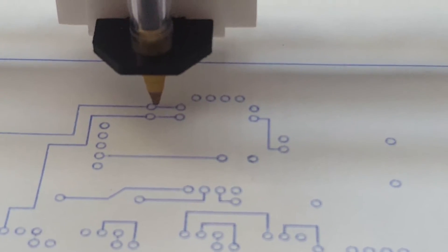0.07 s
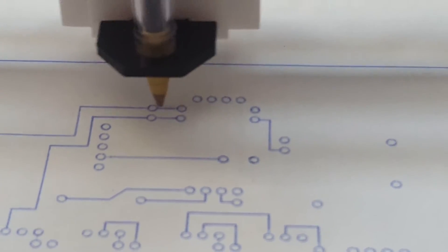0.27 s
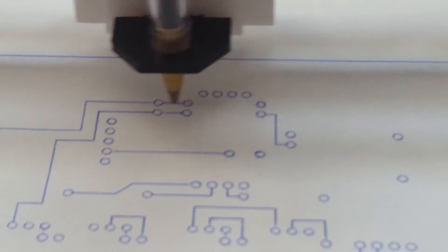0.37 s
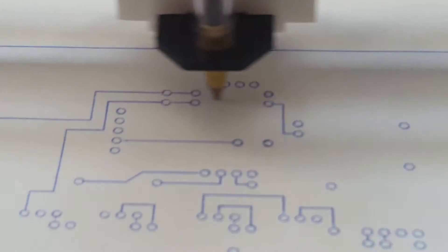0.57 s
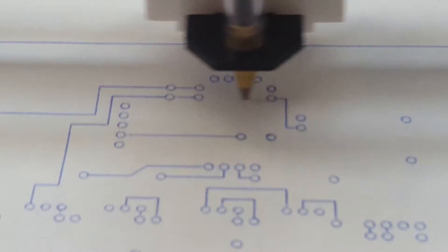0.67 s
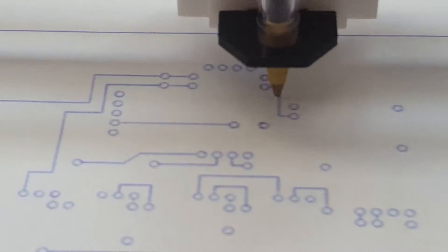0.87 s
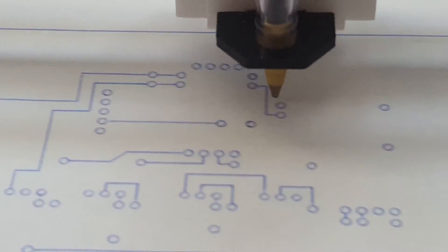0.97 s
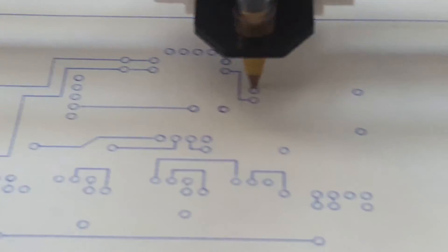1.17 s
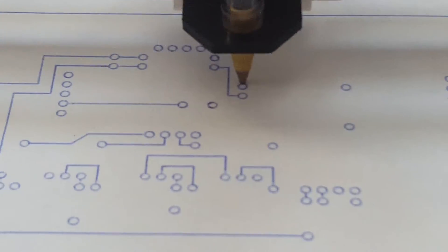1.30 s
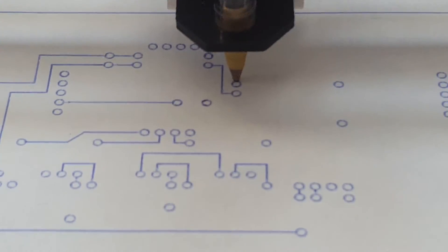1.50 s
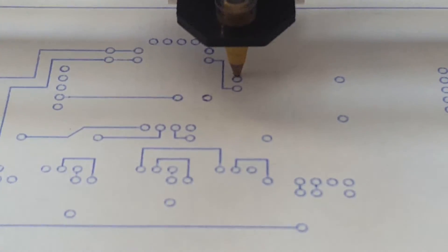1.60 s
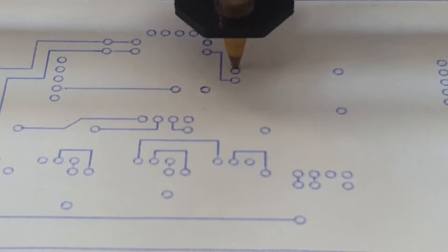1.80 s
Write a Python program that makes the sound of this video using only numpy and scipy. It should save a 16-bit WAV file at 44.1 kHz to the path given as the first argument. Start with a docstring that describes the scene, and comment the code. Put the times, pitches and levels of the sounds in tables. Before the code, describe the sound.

A pen plotter is heard close in a quiet room, starting with faint rapid ticks. At 0.2 seconds its stepper motors start with a click and whir upward in pitch, peaking near 0.7 seconds, then fall, with rattly pulses and small clacks. They stop with a light knock just before 1.2 seconds. A short servo buzz and soft thud follow, then faint rapid ticking until about 1.9 seconds.

```python
"""A pen plotter's stepper motors sing through one move, heard close by in a quiet room.
They speed up and slow down evenly, so their tones rise and fall, swelling at the frame's resonances.
Loose parts rattle at certain speeds, the carriage rustles, and starting and stopping knock the frame.
Then a small geared servo motor lowers the pen. It ticks as it holds still, before and after the move."""
import sys
import numpy as np
from scipy import signal
from scipy.fft import rfft, irfft, next_fast_len
from scipy.io import wavfile
from scipy.ndimage import map_coordinates

SR = 44100
rng = np.random.default_rng(int(sys.argv[2]) if len(sys.argv) > 2 else 0)


def log_audio(samples):
    """Write samples as a 16-bit WAV file to the path given in sys.argv[1]."""
    # one column per channel
    frames = np.atleast_2d(samples).T
    # limit to full scale, then quantise
    limited = np.clip(frames, -1, 1)
    pcm = np.round(limited * 32767).astype(np.int16)
    wavfile.write(sys.argv[1], SR, pcm)


N = 81585

# The stepper motors' tones. Each entry: pitch as a multiple of the step rate.
STEP_MULTIPLES = [1, 2, 4.92, 9.84, 16, 24.6, 32]
# How strong the tones are, one list per tone. Each pair: step rate in Hz, level in dB.
STEP_LEVELS = [
    [(100, -71), (125, -41.5), (140, -31.5), (158, -28.5), (174, -38.5), (192, -26.5), (205, -25.5),
     (222, -18.5), (235, -20.5)],
    [(60, -57), (85, -42), (100, -49), (112, -29), (128, -33), (145, -48.5), (180, -42), (215, -39.5),
     (235, -43)],
    [(20, -59), (35, -40.5), (48, -32.5), (62, -47), (85, -43), (103, -38.5), (135, -49.5), (175, -44.5),
     (200, -36.5), (225, -42.5), (235, -67)],
    [(15, -66), (24, -31.5), (35, -62), (80, -50.5), (92, -50), (100, -35.5), (112, -49), (125, -43),
     (150, -54), (190, -50.5), (205, -70)],
    [(8, -67), (12, -41), (15, -22), (21, -37), (27, -26.5), (37, -28.5), (47, -54), (55, -46.5),
     (67, -44.5), (78, -52), (92, -45), (120, -53), (160, -52), (182, -47.5), (195, -51.5), (208, -39.5),
     (220, -48), (235, -44)],
    [(110, -60), (150, -67.5), (200, -55), (235, -59)],
    [(70, -60), (105, -50.5), (130, -59), (170, -50), (195, -60)],
]
# Where the tones sit. Each entry: left level minus right level in dB.
STEP_PANS = [0, 4, 0, 0.5, 2.5, -2, -1.5]
# Loose parts chattering. Each row: step rate in Hz, level in dB.
RATTLE_LEVELS = [(3, -62), (18, -55.5), (33, -46.5), (40, -46.5), (47, -38.5), (57, -49.5), (66, -57),
                 (77, -39), (88, -57), (100, -33), (110, -58), (119, -46.5), (135, -54.5), (175, -67),
                 (193, -47.5), (210, -59.5)]
# The tone colour of the loose parts. Each row: frequency in Hz, relative level in dB.
RATTLE_COLOUR = [(410, -24), (700, -10), (988, 3), (1500, 0), (1710, -7.5), (2880, -3.5), (3130, -9.5),
                 (4210, -13), (4470, -21.5), (5350, -18.5), (6390, -29), (7370, -22.5), (12000, -46),
                 (15600, -69), (22000, -120)]
# Single clacks of the loose parts. Each row: start in seconds, level in dB.
CLACKS = [(.279, -37), (.2905, -32), (.3105, -35.5), (.3155, -41), (.3195, -39), (.3315, -30.5),
          (.376, -39), (.423, -32), (.456, -31), (.961, -34), (1.005, -41), (1.060, -26.5), (1.067, -30),
          (1.111, -38.5), (1.138, -39.5), (1.179, -37)]
# Knocks on the frame. Each row: start in seconds, level in dB.
JOLTS = [(.219, -26), (0.257, -30), (1.140, -28), (1.18, -39)]
# The frame's ringing notes. Each row: pitch in Hz, relative level in dB, seconds to fade by 60 dB.
FRAME_NOTES = [(160, -41, 0.11), (196.7, -9, 0.17), (232.8, 2.5, 0.19), (456, 2, 0.031), (599, -4.5, 0.028),
               (933, -18, 0.049), (1490, -21, 0.017)]
# The carriage rolling on its rails. Each row: frequency in Hz, relative level in dB.
ROLL_COLOUR = [(35, -81), (60, -33), (188, -6.5), (243, -4.5), (286, -19.5), (450, -15.5), (590, -19.5),
               (745, -41.5), (962, -25.5), (1160, -33), (1850, -39), (2500, -66), (3240, -36), (3900, -40),
               (4700, -38.5), (5280, -34), (6360, -42.5), (15800, -51)]
# The servo's run. Each row: time in seconds, motor speed in Hz, hiss in dB, whine in dB.
SERVO_RUN = [(1.195, 250, -66, -66), (1.201, 329.3, -36, -54), (1.213, 444.3, -37.5, -43),
             (1.231, 482, -30, -43), (1.243, 484.8, -29, -41), (1.262, 474, -29.5, -42),
             (1.278, 384, -28, -45), (1.29, 284, -46, -43), (1.302, 256, -59, -55), (1.325, 200, -65, -87)]
# The whine of meshing gears. Each row: multiple of the motor speed, relative level in dB.
GEAR_TONES = [(5.2, -7.5), (7.6, -1.5), (10.5, -3)]
# The gears taking up their slack. Each row: start in seconds, level in dB.
GEAR_KNOCKS = [(1.2095, -29), (1.222, -32)]
# The clatter of gear teeth. Each row: frequency in Hz, relative level in dB.
TEETH_COLOUR = [(240, -36), (400, -31), (474, -2), (685, -14), (932, -8), (1050, -16), (1350, -7),
                (1620, -41), (1920, -7), (2170, -23.5), (3090, -14), (3550, -11.5), (5140, -9.5),
                (5810, -15), (8670, -4), (13500, -7), (15800, -6)]
# The gear case's resonances. Each row: centre in Hz, width in Hz, relative level in dB.
CASE_RINGS = [(8890, 260, 2), (11930, 240, -2), (13830, 790, -2)]
# The pen arm's thud. Each row: frequency in Hz, relative level in dB.
ARM_COLOUR = [(60, -39), (130, -7), (185, 2), (260, -13.5), (500, -35), (1200, -34)]
# The servo holding still. Each row: first and latest start of a tick cycle in seconds, level in dB.
HOLDS = [(.0015, .105, -49.5), (1.3111, 1.85, -47)]
# The ticks in one cycle. Each row: delay in seconds, relative level in dB, extra treble in dB.
HOLD_TICKS = [(0, 3, -1), (0.0108, -9, 4.5), (0.0167, 1.5, 7)]
# The tone colour of a tick. Each row: frequency in Hz, relative level in dB.
TICK_COLOUR = [(900, -8), (1600, -22), (2100, 4.5), (3000, -5), (4400, 3), (5700, -2.5), (8600, -1),
               (11300, -12), (13000, -7.5), (15500, -23)]
# The sizzle near top speed. Each row: frequency in Hz, relative level in dB.
SIZZLE_COLOUR = [(13000, -42), (15100, -11), (15600, -1), (15900, 1)]
# The room's soft noise. Each row: frequency in Hz, relative level in dB.
ROOM_COLOUR = [(15, -28), (25, -7), (64, -1), (157, 2), (791, -6), (1590, -14.5), (1930, -11),
               (3050, -20.5), (3300, -9.5), (3880, -30), (4330, -23), (5820, -25), (7830, -38),
               (13100, -29), (15800, -23)]
# How alike that noise is left and right. Each row: frequency in Hz, likeness (1 means the same).
ROOM_LIKENESS = [(30, 0.25), (120, 0.7), (600, 0.67), (2000, 0.087), (10000, 0.14)]
# The room's hum. Each row: pitch in Hz, level in dB.
HUM_TONES = [(122, -69), (180, -71)]

START_S, TOP_S, STOP_S = .219, .688, 1.167  # the move starts, reaches top speed, stops
TOP_RATE_HZ, RAMP_HZ_PER_S = 234.5, 500
SWELL_LAG_S, WAVER_DB, PHASE_JITTER = .01, 0.8, 0.11
BLUR, BLUR_FROM_HZ = .135, 1180
RATTLE_LAG_S, RATTLE_SLOWING_DB = 0.0065, 1
SQUEAK_S, SQUEAK_WIDTH_S, SQUEAK_HZ, SQUEAK_DB = 0.42, .009, 4220, -43.5
ROLL_DB, ROLL_GROWTH_DB = -36.5, 6.5  # level at top speed; rise from rest to top speed
THUD_S, THUD_DB, THUD_T60 = 1.212, -36, 0.26  # a T60 is the seconds taken to fade by 60 dB
HOLD_CYCLE_S, TICK_RISE_S, TICK_T60 = .0328, 0.0007, 0.014
SIZZLE_DB, SIZZLE_DB_PER_HZ = -47, 0.13
ECHO_T60, ECHO_DB, ROOM_DB = 0.079, -4, -59.5
BASS_CUT_HZ, TREBLE_CUT_HZ, LEFT_LEAD_S = 126, 15900, .00008


def steppers():
    """The motors' tones follow the step rate; each swells as its pitch crosses a frame resonance."""
    rate = step_rate(clock())
    phase = 2 * np.pi * np.cumsum(rate) / SR
    out = 0
    for k, levels, pan in zip(STEP_MULTIPLES, STEP_LEVELS, STEP_PANS):
        # High tones sound rough below top speed.
        highness = np.clip(k * rate / BLUR_FROM_HZ - 1, 0, 1)
        blur = BLUR * k * (1 - rate / TOP_RATE_HZ) * highness * wobble(420)
        tone = np.sin(k * phase + PHASE_JITTER * np.sqrt(k) * wobble(90) + blur)
        # For the two lowest tones, the frame responds a little late.
        felt_rate = step_rate(clock() - SWELL_LAG_S) if k <= 2 else rate
        level_db = along(levels, felt_rate) + WAVER_DB * wobble(69.94)
        out = out + placed(tone * amp(level_db), pan)
    return out * moving(release_s=0.0055)


def step_rate(t):
    """Motor steps per second: a straight ramp up, then a straight ramp down."""
    return np.maximum(TOP_RATE_HZ - RAMP_HZ_PER_S * np.abs(t - TOP_S), 0)


def moving(release_s):
    """A gain of 1 while the carriage travels, fading after it stops."""
    t = clock()
    return (t > START_S) * np.exp(-np.maximum(t - STOP_S, 0) / release_s)


def rattle():
    """Loose parts chatter when the speed shakes them, with harder clacks; a brief high squeak sounds once."""
    def chattering():
        hits = impacts(per_s=520, scatter=0.27, spread_db=1.2)
        return coloured(hits + .5 * rng.standard_normal(N), RATTLE_COLOUR)

    t = clock()
    late = t - RATTLE_LAG_S
    level_db = along(RATTLE_LEVELS, step_rate(late)) + RATTLE_SLOWING_DB * (late > TOP_S)
    chatter = spread(chattering, pan_db=0) * amp(level_db) * moving(release_s=0.0099)
    clack = spread(lambda: noise(RATTLE_COLOUR) + amp(-28) * rng.standard_normal(N), pan_db=4)
    squeak = np.sin(2 * np.pi * SQUEAK_HZ * t) * np.exp(-((t - SQUEAK_S) / SQUEAK_WIDTH_S) ** 2)
    return chatter + clack * bursts(CLACKS, t60=.017) + amp(SQUEAK_DB) * squeak


def jolts(click_db=-42):
    """The move begins with a click; starting and stopping knock the frame, which rings briefly."""
    out = noise([(500, -10), (4000, -6), (14000, -18)]) * bursts([(START_S, click_db)], t60=0.0092)
    for start, jolt_db in JOLTS:
        age = np.maximum(clock() - start, 0)
        for k, (hz, note_db, t60) in enumerate(FRAME_NOTES):
            fade = amp(jolt_db + note_db - 60 * age / t60)
            out = out + (-1) ** k * fade * np.sin(2 * np.pi * hz * age)
    return placed(out, pan_db=4)


def carriage():
    """The belt and bearings rustle more as the speed grows."""
    level_db = ROLL_DB + ROLL_GROWTH_DB * (step_rate(clock()) / TOP_RATE_HZ - 1)
    rustle = noise(ROLL_COLOUR) * amp(level_db + wobble(61.1))
    return placed(rustle * moving(release_s=0.0092), pan_db=3)


def servo():
    """The small motor spins up and runs down, its gears hissing and whining with it."""
    t = clock()
    times, *columns = np.transpose(SERVO_RUN)
    speed, hiss_db, whine_db = (np.interp(t, times, column) for column in columns)
    running = (t > times[0]) & (t < times[-1])
    phase = 2 * np.pi * np.cumsum(speed) / SR
    motor = sum(np.sin(k * phase) / k for k in range(1, 5)) * (speed / speed.max()) ** 4
    gears = sum(amp(db) * np.sin(k * phase + .85 * wobble(650)) for k, db in GEAR_TONES)
    whine = running * amp(whine_db) * (gears + amp(1) * motor)
    hiss = spread(gear_hiss, pan_db=3) * (running * amp(hiss_db) + bursts(GEAR_KNOCKS, t60=0.014))
    return hiss + whine


def gear_hiss(teeth_db=-2, case_db=-6.5):
    """Tiny gear teeth clatter in a ringing case."""
    def resonances(f):
        return sum(amp(db) * 1j * f * width / (hz * hz - f * f + 1j * f * width)
                   for hz, width, db in CASE_RINGS)

    teeth = impacts(per_s=2400, scatter=.25, spread_db=2) + rng.standard_normal(N)
    case = unit(filtered(teeth, resonances))
    return amp(teeth_db) * coloured(teeth, TEETH_COLOUR) + amp(case_db) * case


def pen_arm(rise_s=0.0017):
    """The arm gives a low thud as the pen is lowered."""
    age = np.maximum(clock() - THUD_S, 0)
    rise = (1 - np.exp(-age / rise_s)) ** 2
    return noise(ARM_COLOUR) * rise * amp(THUD_DB - 60 * age / THUD_T60)


def holding_ticks():
    """At rest the servo nudges itself in a repeating pattern of faint, crisp ticks."""
    t, out = clock(), 0
    for delay, tick_db, treble_db in HOLD_TICKS:
        tick = spread(lambda: noise(TICK_COLOUR), pan_db=2)
        tick = filtered(tick, lambda f: amp(along([(8000, 0), (13000, treble_db)], f)))
        for first, latest, hold_db in HOLDS:
            age = (t - first - delay) % HOLD_CYCLE_S
            level = amp(hold_db + tick_db - 60 * age / TICK_T60) * (1 - np.exp(-age / TICK_RISE_S))
            out = out + tick * level * (t > first + delay) * (t - age < latest)
    return out


def sizzle():
    """A thin sizzle joins near top speed, mostly on the left."""
    level_db = SIZZLE_DB + SIZZLE_DB_PER_HZ * (step_rate(clock()) - TOP_RATE_HZ)
    return placed(noise(SIZZLE_COLOUR) * amp(level_db), pan_db=12)


def reflections(x):
    """Short echoes bounce off the desk and housing, weak in the bass."""
    t = np.arange(SR // 5) / SR
    tail = rng.standard_normal((2, len(t))) * amp(-60 * t / ECHO_T60) * (t > .001)
    echoes = signal.fftconvolve(x, tail / np.linalg.norm(tail[0]), axes=1)[:, :N]
    return filtered(echoes, lambda f: amp(ECHO_DB + along([(220, -5), (600, 1), (1500, 1)], f)))


def room_tone():
    """Soft room noise, partly shared by left and right, and a faint wavering hum."""
    def width(f):
        return np.arccos(np.clip(along(ROOM_LIKENESS, f), -1, 1)) / 2

    mid = filtered(noise(ROOM_COLOUR), lambda f: np.cos(width(f)))
    side = filtered(noise(ROOM_COLOUR), lambda f: np.sin(width(f)))
    hum = sum(amp(db + 2.7 * wobble(8.12)) * np.sin(2 * np.pi * hz * clock() + 0.48 * wobble(9.8))
              for hz, db in HUM_TONES)
    return amp(ROOM_DB) * np.array([mid + side, mid - side]) + hum


def amp(db):
    """Turn decibels into a gain to multiply by."""
    return 10 ** (np.asarray(db) / 20)


def unit(x):
    """Scale a sound to an average strength (rms) of 1."""
    return x / np.sqrt(np.mean(x ** 2) + 1e-20)


def clock():
    """The time of each sample in seconds."""
    return np.arange(N) / SR


def along(points, hz):
    """Read between (Hz, value) points, with octaves about evenly spaced."""
    freqs, values = np.transpose(points)
    return np.interp(np.log(hz + 1), np.log(freqs + 1), values)


def wobble(per_s):
    """A smooth curve through per_s random values a second."""
    return map_coordinates(rng.standard_normal(int(N * per_s / SR) + 4), [clock() * per_s])


def filtered(x, response):
    """Multiply each frequency f in a sound by response(f)."""
    size = next_fast_len(N + SR // 4)
    return irfft(rfft(x, size) * response(np.fft.rfftfreq(size, 1 / SR)), size)[..., :N]


def coloured(x, points):
    """Give a sound the tone colour in (Hz, dB) points, at strength 1."""
    size = 4096
    cepstrum = irfft(np.log(amp(along(points, np.fft.rfftfreq(size, 1 / SR)))))
    # Folding onto the first half makes the filter ring after a hit, never before it.
    cepstrum[1:size // 2] *= 2
    cepstrum[size // 2 + 1:] = 0
    ring = irfft(np.exp(rfft(cepstrum)))
    return unit(signal.fftconvolve(x, ring)[:N])


def noise(points):
    """Noise with the given tone colour, at strength 1."""
    return coloured(rng.standard_normal(N), points)


def impacts(per_s, scatter, spread_db):
    """A stream of tiny hits, uneven in timing and force."""
    timing, force = rng.standard_normal((int(per_s * N / SR), 2)).T
    at = (np.arange(len(timing)) + scatter * timing) / per_s * SR
    hits = amp(spread_db * force) * rng.choice([-1, 1], len(force))
    return unit(np.bincount(np.clip(at, 0, N - 1).astype(int), hits, N))


def bursts(rows, t60):
    """A gain that jumps at each (seconds, dB) blow and dies away."""
    t = clock()
    return sum((t > start) * amp(db - 60 * np.maximum(t - start, 0) / t60) for start, db in rows)


def placed(x, pan_db):
    """Place a sound in stereo, with the left louder by pan_db."""
    return x * amp([[pan_db / 2], [-pan_db / 2]])


def spread(make, pan_db, side_db=-1.5):
    """Make a wide sound: one shared random version plus a weaker one for each side."""
    return placed(unit(make() + amp(side_db) * np.array([make(), make()])), pan_db)


def scene():
    """Mix the plotter and the room. The small frame gives off little bass and stands slightly left."""
    bass_cut = signal.butter(3, BASS_CUT_HZ, "high", fs=SR, output="sos")
    frame = signal.sosfilt(bass_cut, steppers() + rattle() + jolts())
    machine = frame + carriage() + servo() + pen_arm()
    ticks = holding_ticks()
    lead_s = LEFT_LEAD_S * np.array([[.5], [-.5]])  # the sound reaches the left side first
    direct = filtered(machine + ticks, lambda f: np.exp(2j * np.pi * f * lead_s))
    return direct + reflections(machine + .5 * ticks) + room_tone() + sizzle()


def record(dry):
    """Cut away the very highest treble."""
    return filtered(dry, lambda f: f < TREBLE_CUT_HZ)


dry = scene()
out = record(dry)
log_audio(out)
```